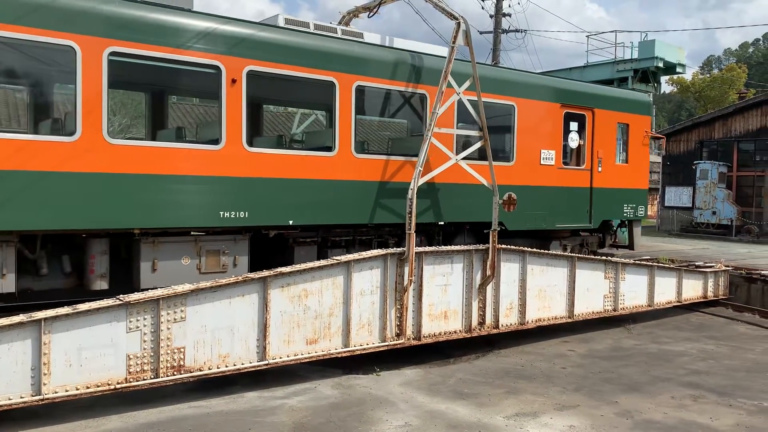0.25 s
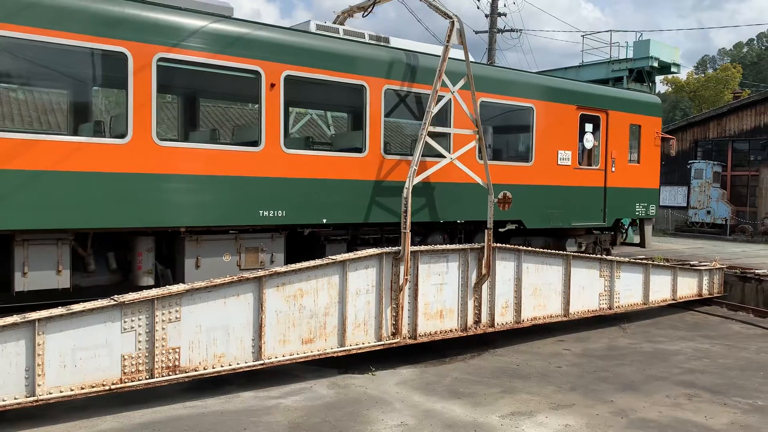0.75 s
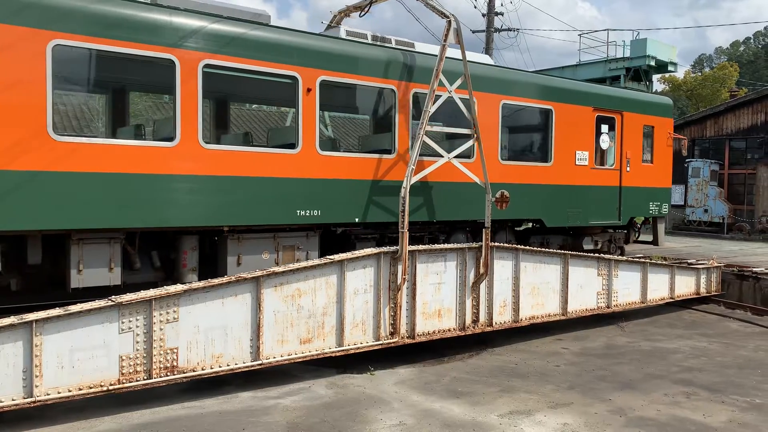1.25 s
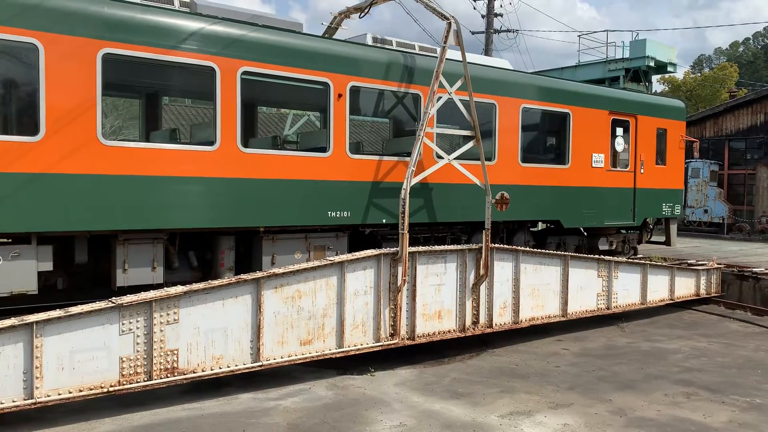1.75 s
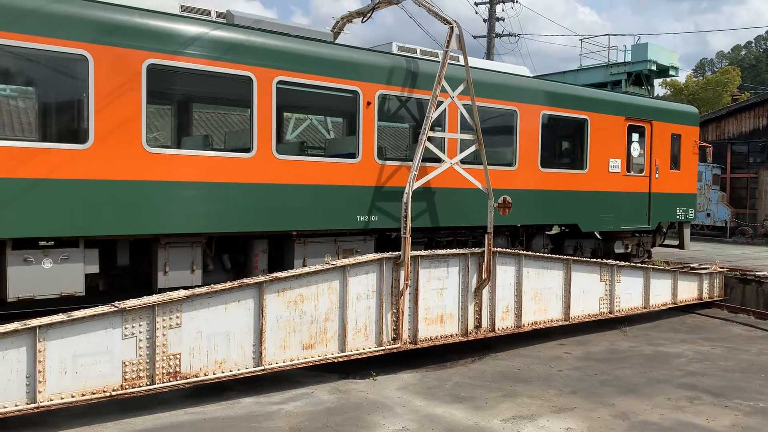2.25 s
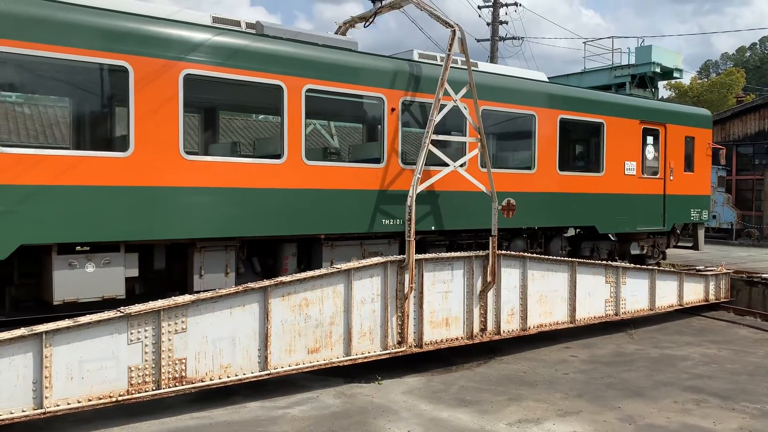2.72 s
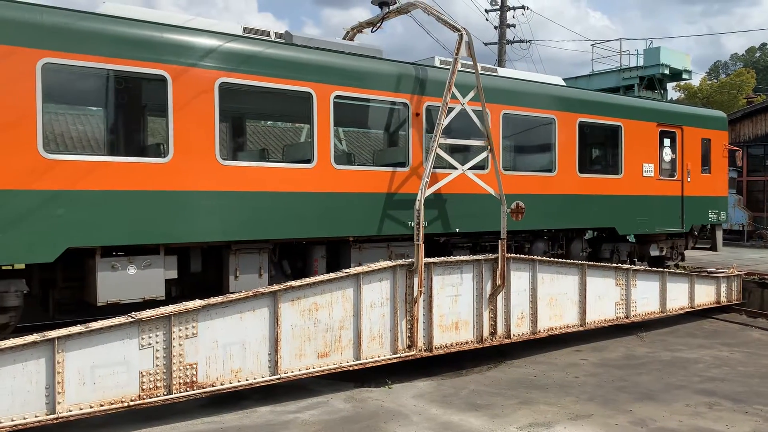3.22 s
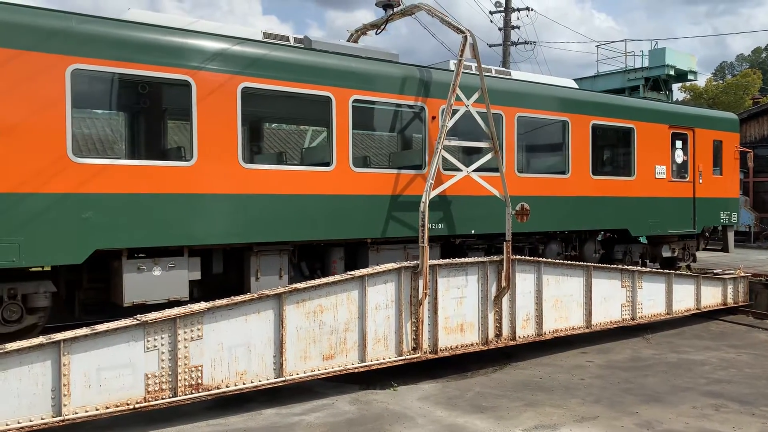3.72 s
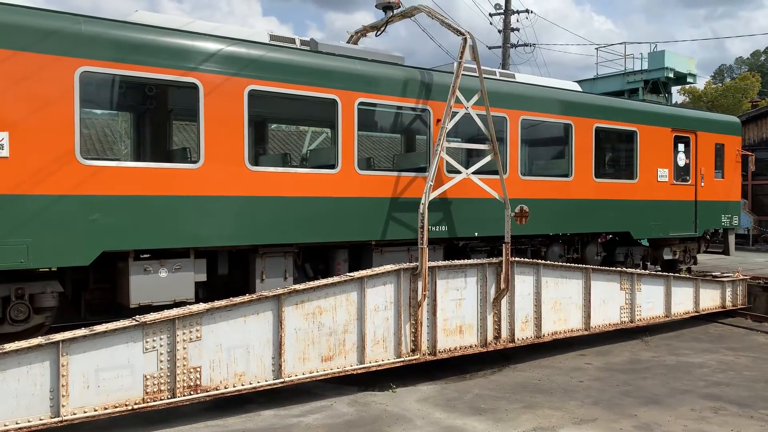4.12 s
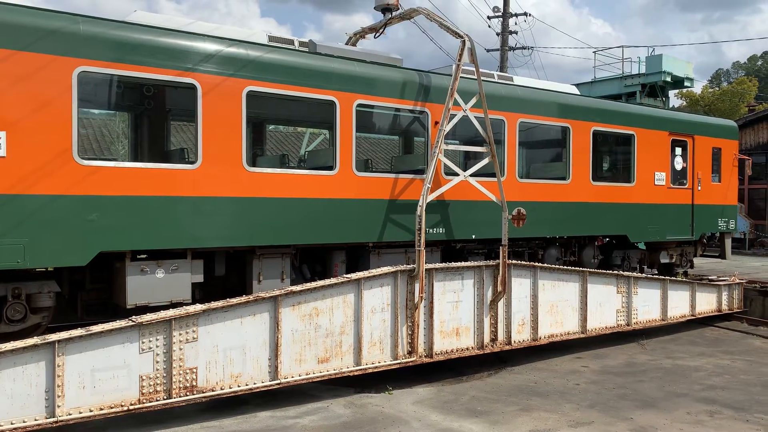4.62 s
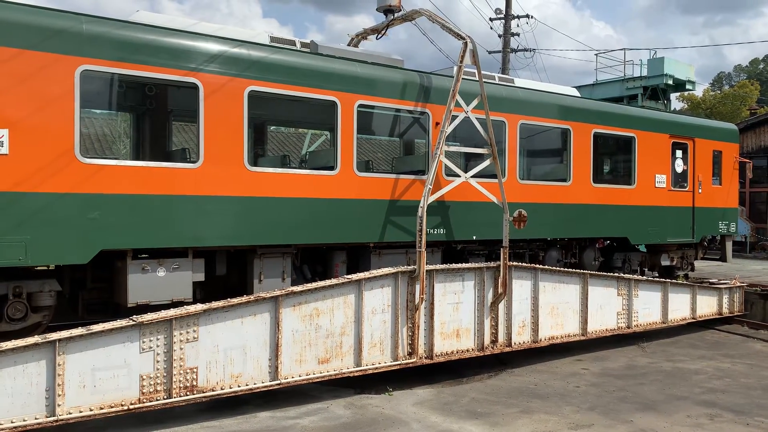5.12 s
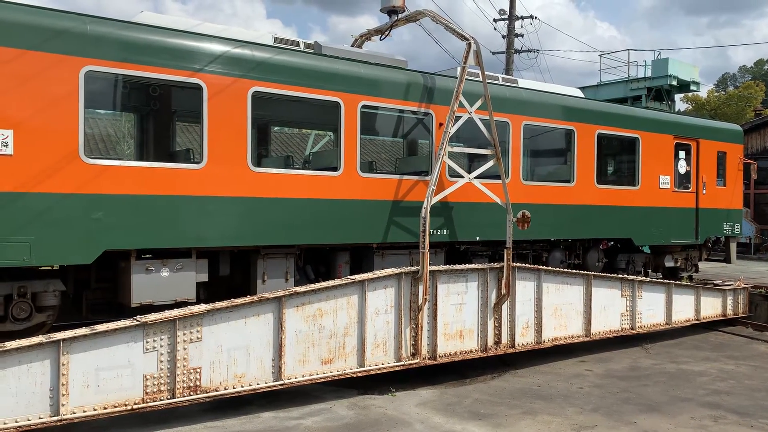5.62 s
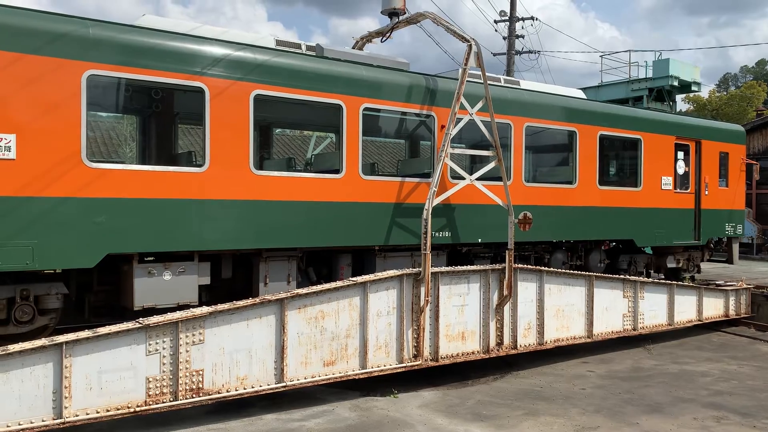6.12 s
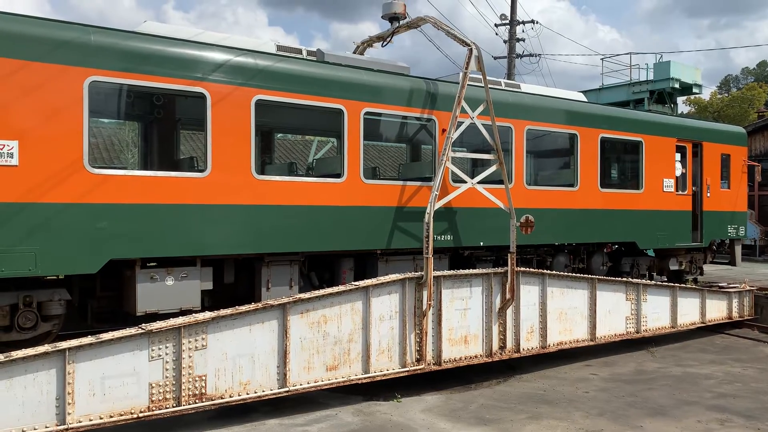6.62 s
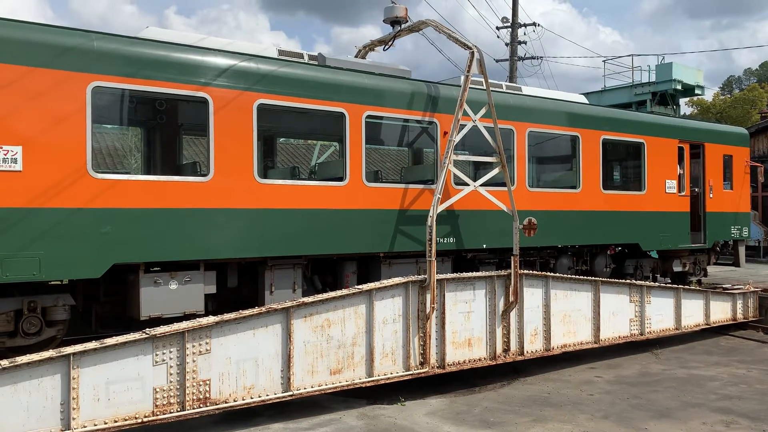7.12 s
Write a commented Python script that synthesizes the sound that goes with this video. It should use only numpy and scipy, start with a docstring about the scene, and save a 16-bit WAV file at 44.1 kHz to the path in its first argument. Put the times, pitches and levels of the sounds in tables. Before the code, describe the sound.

Heavy metallic clunks and low booms from a slow railcar crossing a girder, over steady throaty diesel idle, then squeal, air vent and another clatter.

```python
"""A diesel railcar creeps over the steel girder of a turntable in a rail yard, engine idling throughout.
First the wheels clatter over rail joints (struck modes) and the girder booms and rattles (shaped noise).
Sparser blows follow, while gear whine and hums (gliding sines) come and go. From about 3 s a thin air leak
swells (coloured noise); near 4 s a brake squeals (sines), then a valve vents (coloured noise); near 6.5 s the
wheels clatter over another gap. Two close microphone ports hear direct sound and sound scattered round the yard."""
import sys
import numpy as np
from scipy import signal
from scipy.fft import rfft, irfft
from scipy.io import wavfile
from scipy.ndimage import uniform_filter1d

SR = 44100
rng = np.random.default_rng(int(sys.argv[2]) if len(sys.argv) > 2 else 0)


def master_out(mix):
    """Clip the mix to full scale and print it as 16-bit PCM to the path in sys.argv[1]."""
    frames = np.transpose(np.atleast_2d(mix))
    ceiling = np.clip(frames, -1, 1)
    pcm = np.round(ceiling * 32767).astype(np.int16)
    wavfile.write(sys.argv[1], SR, pcm)


N = 324576
TIME, HZ = np.arange(N) / SR, np.fft.rfftfreq(N, 1 / SR)

# wheels striking rail joints: (time [s], boom level [dB], boom frequency [Hz], thud level [dB],
# clang level [dB], ring level [dB], loudest mode [Hz]); levels relative
JOINT_BLOWS = [(0.245, -3, 260, -24, -39, -36, 296), (0.265, -15, 106, -15, -32, -35, 296),
               (0.304, -14, 110, -18, -24, -26, 215), (0.335, -4, 100, -9, -38, -24, 215),
               (0.376, -11, 110, -17, -30, -21, 1666), (0.393, -10, 111, -9, -12.5, -12.5, 1666),
               (0.407, -6, 107, -20, -17, -28, 692), (0.428, -14, 115, -21, -17, -40, 400),
               (0.463, -13, 96, -11, -15, -38, 692), (0.5, -22, 168, -20, -12, -19, 400),
               (0.52, -12, 85, -15, -9, -28, 461), (0.533, -11, 84, -15, -4.5, -14, 786),
               (0.548, -15, 85.5, -20, -8, -27, 461), (0.563, -10, 70, -14, -22, -40, 400),
               (0.628, -17, 109, -15.5, -21, -50, 296), (0.734, -8.5, 81, -35, -44, -52, 296),
               (1.706, -15, 80, -31.5, -34, -31, 296), (1.904, -33, 130, -17.5, -21, -38, 527),
               (1.94, -22, 130, -22, -25, -37, 400), (2.28, -12.5, 124, -21, -33, -32, 215),
               (2.395, -13.5, 136, -19, -24, -44, 517), (2.421, -12, 120, -22, -36, -36, 215),
               (2.467, -21, 151, -28, -21.5, -20, 1650), (2.485, -25, 127, -16, -12.5, -20, 517),
               (2.5, -25, 127, -20, -23, -24, 786), (2.533, -19, 129, -13.5, -18, -32, 400),
               (2.603, -18, 120, -13, -37, -37, 296), (2.64, -14, 100, -31, -39, -40, 215),
               (2.686, -15, 102, -26, -36, -40, 215), (2.9, -12, 74, -36, -36, -38, 400),
               (3.837, -20, 91, -43, -36, -41, 400), (4.048, -16.5, 101, -29, -27, -43, 580),
               (4.461, -25, 91.5, -22.5, -44, -41, 400), (4.58, -18, 72, -51, -29, -40, 786),
               (5.412, -13.5, 82.5, -46, -47, -41, 400), (6.489, -38, 170, -34, -27, -28, 215),
               (6.505, -31, 159, -12, -31, -30, 215), (6.524, -24, 150, -15, -27, -37, 296),
               (6.551, -11, 129, -13.5, -39, -40, 296), (6.601, -11, 99, -24, -19, -28, 215),
               (6.633, -5, 88.5, -23, -17, -28, 296), (6.658, -23, 110, -19, -21, -26, 215),
               (6.694, -4.5, 122, -19, -15, -30, 461), (6.726, -5, 102, -22, -32, -29, 296),
               (6.768, -18, 102.3, -15.5, -23, -40, 296), (6.812, -11, 87.4, -26, -37, -36, 215),
               (6.95, -14, 109, -29, -44, -42, 215)]
# girder modes: (frequency [Hz], relative level [dB], decay scale [s]); a struck mode falls 60 dB in half of it
GIRDER_MODES = [(61.6, 5, 0.4), (80.3, 4.5, 0.55), (114.6, 6, 0.63), (139.5, 0.5, 0.41), (217, -2, 0.25),
                (297, -8, 0.41), (398, -8, 0.17), (457.4, -8.5, 0.3), (524, -19, 0.55), (584, -4.5, 0.097),
                (687.5, -15.5, 0.89), (785, -4.5, 0.1), (1472, -2, 0.1), (1642, -3, 0.14),
                (1770, -11.5, 0.54), (2067, 0, 0.085), (2257, -2, 0.068)]
# loose plates and rivets between the modes: (frequency [Hz], relative density [dB per Hz])
LOOSE_STEEL = [(25, -57), (45, -25), (80, -18.5), (200, -2.5), (400, 1), (800, -4), (1100, -5.5),
               (1600, -16), (2000, -19), (3000, -20), (5000, -27.5), (9000, -38.5), (16000, -42)]
# edges between boom, thud, clang, ring and rattle: (frequency [Hz])
BAND_EDGES_HZ = [170, 450, 1100, 2000]
# steady rolling on the girder: (time [s], boom level [dB], steel level [dB]); levels relative
ROLLING_LEVELS = [(0, -29.5, -31), (.8, -17.5, -28), (1.44, -25, -32.5), (1.95, -30, -31), (2.3, -22, -36),
                  (2.95, -17.5, -29), (3.4, -29.5, -35.5), (4.05, -27.5, -37), (4.2, -37, -37),
                  (4.5, -29.5, -41), (5.45, -26, -38.5), (6.35, -34, -36.5), (7.0, -41, -36),
                  (7.36, -29.5, -34)]
# wheels grinding across the gap at the girder's end: (start [s], length [s], boom level [dB],
# steel level [dB], rattle level [dB]); levels relative
GAP_CROSSINGS = [(0.191, 0.39, -15, -22, -35), (2.44, 0.07, -13.5, -21.5, -39.5),
                 (6.464, 0.071, -18, -23.5, -30.5), (6.623, 0.11, -16.5, -24.5, -34)]
# a crossing's rise in each of the five bands: (time [s])
BAND_RISE_S = [0.13, 0.039, 0.038, 0.067, 0.029]
# a crossing's decay in each of the five bands: (rate [dB per s])
BAND_FALL_DB_PER_S = [26, 40.3, 65.4, 60, 69]
# strength of each of the six cylinders: (relative level [dB])
CYLINDER_STRENGTH_DB = [1.3, 2.8, 8.5, 1.9, 1.2, 5.5]
# engine idle spectrum: (frequency [Hz], relative density [dB per Hz])
IDLE_SPECTRUM = [(25, -46), (45, -3), (70, -0.5), (170, -18), (330, -13.5), (750, -6.5), (1050, -8),
                 (1450, -9), (1800, -11), (1930, -12.5), (2800, -21), (3400, -23), (5500, -31.5),
                 (10000, -36.5), (16000, -40.5)]
# panels and pipes of the engine bay: (frequency [Hz], width [Hz], lift [dB])
BAY_RESONANCES = [(400, 40, 13), (559, 35, 8.5), (647, 67, 2), (1233, 130, 3.5), (1555, 135, 5),
                  (1720, 110, 9)]
# low orders of the engine cycle: (multiple of the cycle rate [1], level [dB])
ENGINE_ORDERS = [(8, -44), (12, -40.5), (16, -45.5)]
# gear whine of the drive, drifting in pitch: (time [s], frequency [Hz], level [dB])
GEAR_WHINE = [(.9, 862, -34.5), (1.3, 862, -41), (1.45, 852, -40.5), (2.7, 860.6, -43.5), (3.3, 854, -42.5),
              (3.8, 848, -32), (4.05, 845, -40), (4.2, 841, -47), (4.65, 836, -35.5), (4.95, 843, -42.5),
              (5.1, 847, -35.5), (6.3, 846.6, -41), (7.0, 855, -35.5), (7.36, 855, -45)]
# hums that come and go: (start [s], length [s], first frequency [Hz], last frequency [Hz], level [dB])
ROLLING_HUMS = [(1.405, 1.31, 128.4, 145.2, -32), (4.098, 0.97, 660, 657, -41),
                (6.956, 0.27, 142.5, 143, -34.5)]
# brake squeals, one list each: (time [s], frequency [Hz], level [dB])
BRAKE_SQUEALS = [
    [(3.88, 7245, -58), (3.93, 7257, -45), (4.04, 7309, -57)],
    [(4.05, 7712, -53), (4.12, 7711, -33), (4.24, 7708, -39), (4.32, 7706, -28), (4.39, 7705, -32),
     (4.48, 7704, -44), (4.53, 7699, -58)],
]
# venting valve: (opening time [s], rise [s], hold [s], fall [s])
VENT_TIMING = (4.695, 0.032, 0.061, 0.22)
# spectrum of the venting air: (frequency [Hz], relative density [dB per Hz])
VENT_SPECTRUM = [(300, -8), (1200, -7), (2200, -7.5), (3500, -10), (6000, -11.5), (9000, -16.5),
                 (12000, -9.5), (13000, -17), (15500, -17)]
# whistles in the valve: (frequency [Hz], width [Hz], lift [dB])
VALVE_WHISTLES = [(1200, 60, 4), (2250, 90, 6), (6250, 90, 7)]
# thin air leak: (time [s], level [dB])
LEAK_LEVELS = [(3.8, -54), (4.98, -49), (5.7, -47.5), (6.2, -68)]
# spectrum of the leak: (frequency [Hz], relative density [dB per Hz])
LEAK_SPECTRUM = [(4000, -15), (7000, -11), (11000, 11), (13000, 4.5), (15500, -20)]
# short treble puffs: (time [s], relative level [dB])
TREBLE_PUFFS = [(0.2164, -46), (0.3865, -47), (0.5377, -43), (0.5781, -47), (0.7961, -45), (1.003, -43),
                (2.4818, -50), (3.19, -45), (6.4846, -49), (6.576, -41), (6.6623, -39.5), (7.3372, -48)]
# microphone ports: (frequency [Hz], likeness [0-1], left's lead [rad], left over right [dB])
PORT_RESPONSE = [(0, .85, 0, 0), (330, .88, .15, .5), (600, .72, .6, 2.3), (1100, .6, .6, 3.2),
                 (1550, .6, .7, 1.6), (1900, .5, 2.9, -1), (2300, .45, 4.5, 1.4), (5000, .35, 15, -3.8),
                 (6300, .65, 18.85, -1), (7800, .96, 16.6, 0), (16000, .96, 5.6, 0)]

PUSH_CYCLES = 0.6  # cycles until a low push peaks
STRUCK_DB, STRUCK_OCTAVES = 11, .06  # the mode nearest the struck spot rings louder
BOOM_RING_DB = -9  # ringing of the low modes under each push
LOOSE_DB = -6.5  # a blow's rattle band under its ring band
ROLL_RATTLE_DB = -13.5  # rattle under steel in steady rolling
LURCH_DB, LURCH_S = 1.5, 0.015  # brief jump of ring and rattle as a crossing reaches its height
FIRING_HZ, IDLE_DB = 37.06, -26.5
HUM_RISE_S, HUM_FALL_S, HUM_EDGE_DB = 0.15, 0.044, -18
VENT_DB = -19
EDGE_HZ = 15850  # upper band limit


def blows():
    """Impulse response: each blow gives a low push, ringing modes and a burst of loose steel."""
    out, t = np.zeros((2, N + SR)), TIME[:SR // 2]
    hz, t60s = np.fft.rfftfreq(len(t), 1 / SR), (0.45, 0.21, 0.28, 0.041, 0.16)
    for s, boom_db, boom_hz, thud_db, clang_db, ring_db, struck_hz in JOINT_BLOWS:
        levels_db = boom_db + BOOM_RING_DB, thud_db, clang_db, ring_db, ring_db + LOOSE_DB
        sound = amp(boom_db - 7.5) * low_push(t, boom_hz)
        modes_spectrum = rfft(struck_modes(t, struck_hz))
        loose_spectrum = rfft(rng.standard_normal((2, len(t)))) * amp(read(LOOSE_STEEL, hz))
        for part, t60, db in zip(bands(hz), t60s, levels_db):
            loose = evened(irfft(loose_spectrum * part)) * amp(-60 * t / t60)
            ring = irfft(modes_spectrum * part) + 0.33 * loose
            ring *= np.minimum(t / 0.006, 1) * (1 - t / t[-1])
            early_power = np.mean(ring[:, 100:700] ** 2)
            sound = sound + amp(db - 5.0) * ring / np.sqrt(2 * early_power)
        out[:, round(s * SR):][:, :len(t)] += sound
    return out[:, :N]


def low_push(t, hz):
    """Heavily damped oscillation: a low push swells and dies within a few cycles."""
    swell = t * hz / PUSH_CYCLES
    return swell * np.exp(1 - swell) * np.sin(2 * np.pi * (hz * t + np.array([[0], [.05]])))


def struck_modes(t, struck_hz):
    """Modal superposition: damped sines, loudest near struck_hz, the lowest in step with the push."""
    out = 0
    for hz, db, decay in GIRDER_MODES:
        near_db = STRUCK_DB * np.exp(-(np.log2(hz / struck_hz) / STRUCK_OCTAVES) ** 2)
        gain = amp(db + near_db + 2 * rng.standard_normal() - 60 * t / (.5 * decay))
        turns = hz * (1 + 0.0079 * rng.standard_normal()) * t
        phase = (hz > BAND_EDGES_HZ[0]) * rng.random() + np.array([[0], [1 / 5]])
        out = out + gain * np.sin(2 * np.pi * (turns + phase))
    return out


def rolling():
    """Random excitation of a resonator: lumpy noise under the moving load, coloured by the girder."""
    modes = sum(amp(db) / np.sqrt(1 + ((HZ - f) * decay / 1.9) ** 2) for f, db, decay in GIRDER_MODES)
    colour, out = amp(read(LOOSE_STEEL, HZ)) + 0.54 * modes, 0
    for k, (part, db) in enumerate(zip(bands(HZ), (-5.5, -1.0, -3.5, -10.0, 3.0))):
        lumps = amp(1.5 * drift(14) + (k > 2) * 2.5 * drift(70))  # ring and rattle flutter faster too
        out = out + amp(db) * evened(noise(colour * part) * lumps) * load(k)
    return out


def load(k):
    """Addition of powers: gain of band k from steady rolling and from each crossing's rise, hold and decay."""
    s, boom, steel = np.transpose(ROLLING_LEVELS)
    steady_db = [boom, steel, steel, steel, steel + ROLL_RATTLE_DB][k]
    power = amp(np.interp(TIME, s, steady_db)) ** 2
    for start, length, boom, steel, rattle in GAP_CROSSINGS:
        since = TIME - start
        crossing_db = [boom, steel, steel, steel, rattle][k]
        fall_db = BAND_FALL_DB_PER_S[k] * np.maximum(since - length, 0)
        lurch_db = (k > 2) * LURCH_DB * np.exp(-((since - BAND_RISE_S[k]) / LURCH_S) ** 2)
        rise = np.clip(since / BAND_RISE_S[k], 0, 1)
        power = power + (rise * amp(crossing_db - fall_db + lurch_db)) ** 2
    return np.sqrt(power)


def engine():
    """Periodic excitation: firings puff the roar's upper part, its bass comes in lumps, low orders hum."""
    colour = amp(read(IDLE_SPECTRUM, HZ) + lift(BAY_RESONANCES))
    upper, bass = 1 / (1 + (900 / (HZ + 1)) ** 4), 1 / (1 + (HZ / 160) ** 4)
    middle = 1 - upper - bass
    firings = np.cumsum(FIRING_HZ + 0.084 * drift(1.8)) / SR + 0.27
    whole = firings.astype(int)
    chance_db = 3.1 * np.clip(rng.standard_normal(N), -2, 1)[whole]  # one draw per firing
    knock = amp(np.array(CYLINDER_STRENGTH_DB)[whole % 6] + chance_db)
    puff = 1 + 0.15 * knock * np.exp(-(firings % 1) / 0.51)

    def share(part):
        return np.linalg.norm(colour * part) / np.linalg.norm(colour)

    roar = share(upper) * evened(patchy(noise(colour * upper), 3.2) * puff)
    middle_gain = amp(0.88 * drift(32)) * puff ** 0.51
    roar += share(middle) * evened(patchy(noise(colour * middle), 2.8) * middle_gain)
    roar += share(bass) * evened(noise(colour * bass) * amp(4.2 * drift(12)))
    orders = 0
    for multiple, db in ENGINE_ORDERS:
        turns = multiple * firings / 6 + rng.random((2, 1))  # six firings make one cycle
        orders = orders + np.sqrt(2) * amp(db + 0.7 * drift(0.73)) * np.sin(2 * np.pi * turns)
    return amp(IDLE_DB) * roar + orders


def gear_whine():
    """Frequency and amplitude modulation: a wavering sine, its level drifting at random."""
    return tone(GEAR_WHINE, waver_hz=1.1) * amp(2.2 * drift(3.2))


def hums():
    """Gliding pure tones: each hum swells, holds and fades."""
    out = 0
    for start, length, first_hz, last_hz, db in ROLLING_HUMS:
        s = start + np.array([0, min(HUM_RISE_S, length / 3), length - min(HUM_FALL_S, length / 2), length])
        hz = first_hz + (last_hz - first_hz) * (s - start) / length
        rows = np.transpose([s, hz, db + HUM_EDGE_DB * np.array([1, 0, 0, 1])])
        out = out + tone(rows, waver_hz=0.9)
    return out


def brake_squeals():
    """Harmonic series: each squeal is a wavering sine with a faint second harmonic."""
    squeals = sum(tone(rows, waver_hz=3) + amp(-24) * tone(rows, multiple=2, waver_hz=9)
                  for rows in BRAKE_SQUEALS)
    return squeals * amp(1.06 * drift(28.9))


def valve_blast():
    """Jet noise with resonances: broadband hiss with whistling peaks, rising, holding and falling."""
    blast = np.transpose([np.cumsum(VENT_TIMING), VENT_DB + np.array([-16.5, -1.0, 0.0, -29.0])])
    hiss = noise(amp(read(VENT_SPECTRUM, HZ) + lift(VALVE_WHISTLES)))
    return level(blast) * hiss * amp(0.63 * drift(40))


def air_leak():
    """Turbulence noise: a thin coloured hiss that slowly swells and fades."""
    return level(LEAK_LEVELS, fade=1.0) * noise(amp(read(LEAK_SPECTRUM, HZ)))


def treble_puffs():
    """Band-passed noise under exponential decay: short puffs of hiss."""
    out, hiss, t = np.zeros((2, N)), rng.standard_normal((2, N)), TIME[:4000]
    band = signal.butter(2, [7000, 11500], "band", fs=SR)
    for s, db in TREBLE_PUFFS:
        part = out[:, round(s * SR):][:, :len(t)]
        puff = signal.lfilter(*band, hiss[:, round(s * SR):][:, :len(t)])
        envelope = np.minimum(t / 0.0022, 1) * amp(-60 * t / 0.22)
        part += amp(db + 11.5) * puff * envelope[:part.shape[1]]
    return out


def tone(rows, multiple=1, waver_hz=1.43):
    """Phase as the integral of frequency: a sine on a pitch curve, its scattered copy a quarter turn on."""
    s, hz = np.transpose(rows)[:2]
    turns = multiple * np.cumsum(np.interp(TIME, s, hz) + waver_hz * drift(6.7)) / SR
    phase = rng.random() + np.array([[0], [1 / 4]])
    return np.sqrt(2) * level(rows, column=2) * np.sin(2 * np.pi * (turns + phase))


def noise(gain):
    """Incoherence: two unrelated noises of one colour, for direct and scattered sound."""
    return evened(irfft(rfft(rng.standard_normal((2, N))) * gain, N))


def patchy(x, depth_db):
    """Short-time spectral modulation: small random patches in time and pitch speak up for a moment."""
    z = signal.stft(x, nperseg=1024, noverlap=768)[2]
    field = uniform_filter1d(rng.standard_normal(z.shape[1:]), size=2, axis=0)
    field = uniform_filter1d(field, size=7, axis=1)
    grain = amp(depth_db * evened(field))
    return signal.istft(z * evened(grain), nperseg=1024, noverlap=768)[1][:, :N]


def drift(top_hz):
    """Low-passed randomness: a slow wander of rms 1."""
    return evened(irfft(rfft(rng.standard_normal(N)) / (1 + (HZ / top_hz) ** 2), N))


def bands(hz):
    """Complementary crossover: overlapping shares for boom, thud, clang, ring, rattle that sum to 1."""
    below = [1 / (1 + (hz / edge) ** 4) for edge in BAND_EDGES_HZ]
    return np.diff([0 * hz, *below, 0 * hz + 1], axis=0)


def lift(peaks):
    """Resonance curves: peaks standing out of a spectrum, in dB."""
    return sum(db / (1 + (2 * (HZ - hz) / width) ** 2) for hz, width, db in peaks)


def level(rows, column=1, fade=0.0092):
    """Envelope: gain along a dB column, fading in and out over fade seconds beyond the ends."""
    s, db = np.transpose(rows)[[0, column]]
    outside = np.maximum(s[0] - TIME, 0) + np.maximum(TIME - s[-1], 0)
    return amp(np.interp(TIME, s, db)) * np.clip(1 - outside / fade, 0, 1)


def read(points, hz):
    """Logarithmic pitch scale: a curve interpolated along log frequency."""
    f, value = np.transpose(points)
    return np.interp(np.log(hz + 1), np.log(f + 1), value)


def amp(db):
    """Decibel law: amplitude ratio of a level in dB."""
    return 10 ** (np.asarray(db) / 20)


def evened(x):
    """Normalisation to an rms of 1."""
    return x / np.sqrt(np.mean(x ** 2) + 1e-20)


def scene():
    """Superposition of all sources, as direct sound and sound scattered round the yard."""
    girder = blows() + patchy(rolling(), 1)
    tones = gear_whine() + hums() + brake_squeals()
    air = patchy(valve_blast() + air_leak() + treble_puffs(), 3)
    return girder + engine() + tones + air


def record(dry):
    """Partial coherence: the right port blends phase-shifted direct sound with scattered sound."""
    hz, *columns = np.transpose(PORT_RESPONSE)
    same, lead, tilt_db = (np.interp(HZ, hz, c) for c in columns)
    same = np.clip(same, 0, 1)
    direct, scattered = rfft(dry) / np.sqrt(1 + (38 / (HZ + 1)) ** 6)  # bass cut
    right = same * np.exp(-1j * lead) * direct + np.sqrt(1 - same ** 2) * scattered
    ports = irfft([direct * amp(tilt_db / 2), right * amp(-tilt_db / 2)], N)
    ports = 1.1 * np.tanh(ports / 1.1)  # the input stage rounds the highest peaks
    band_limit = signal.firwin(511, EDGE_HZ, window=("kaiser", 9), fs=SR)
    return signal.oaconvolve(ports, band_limit[None], "same")


dry = scene()
out = record(dry)
master_out(out)
```